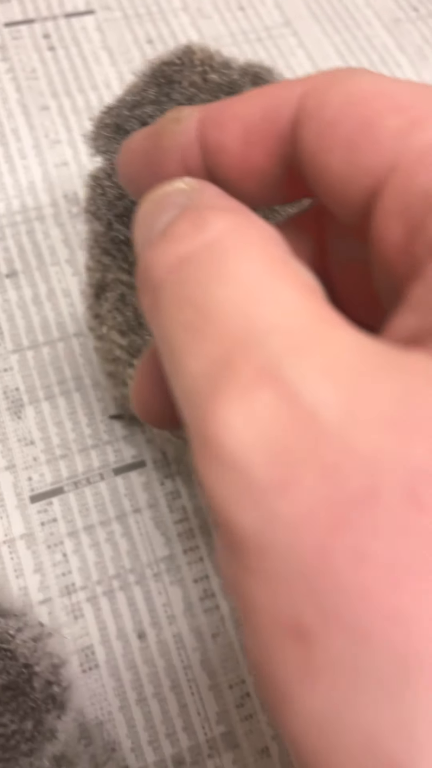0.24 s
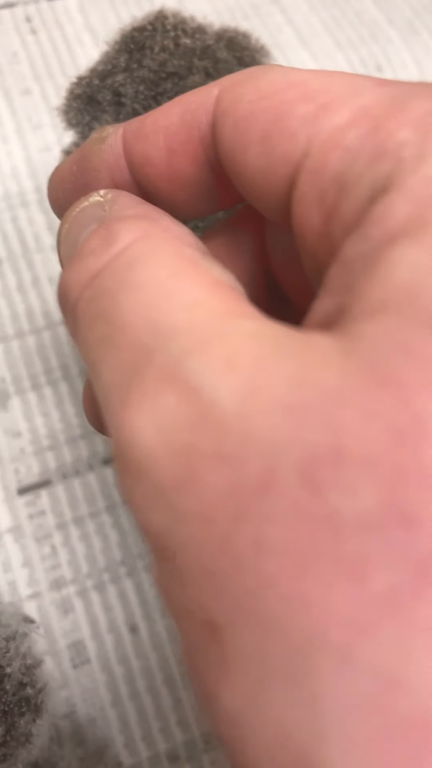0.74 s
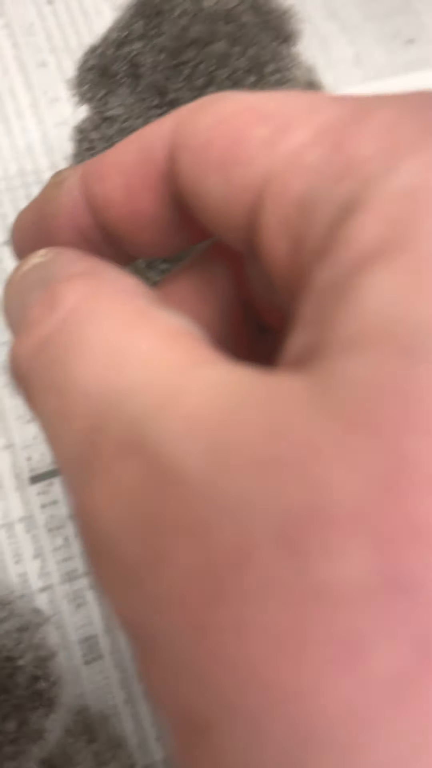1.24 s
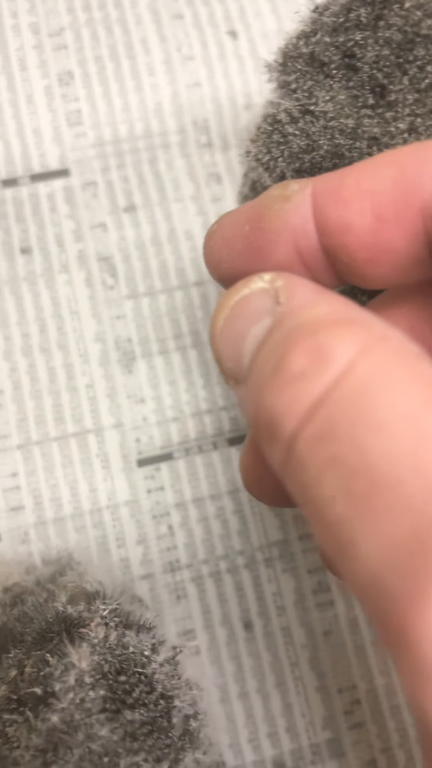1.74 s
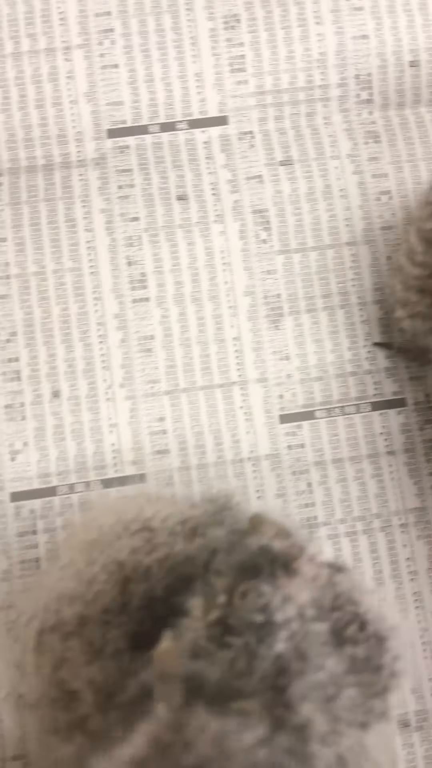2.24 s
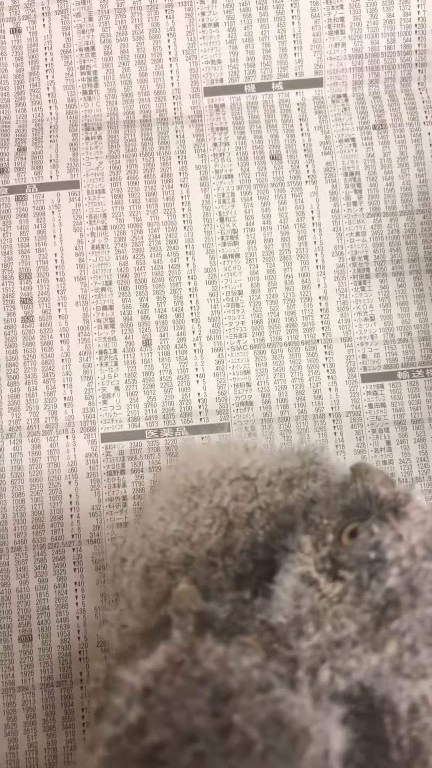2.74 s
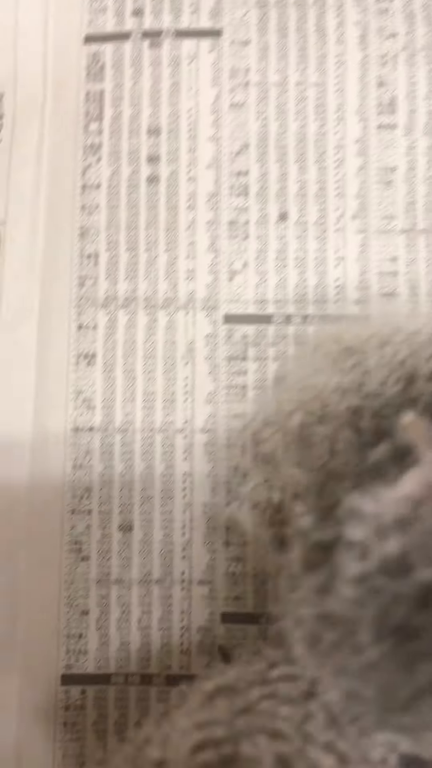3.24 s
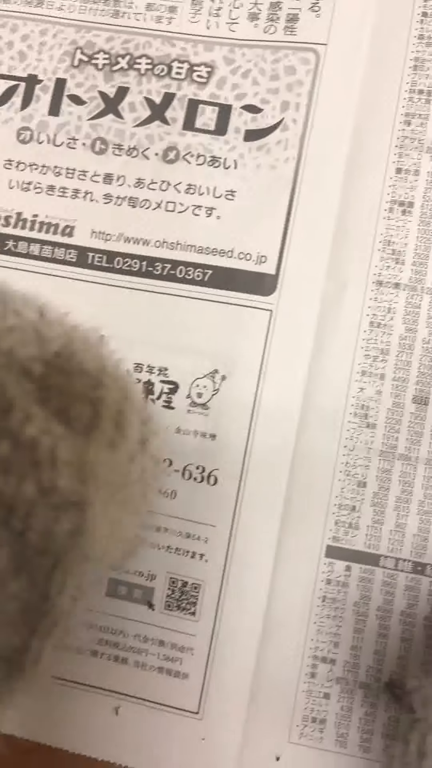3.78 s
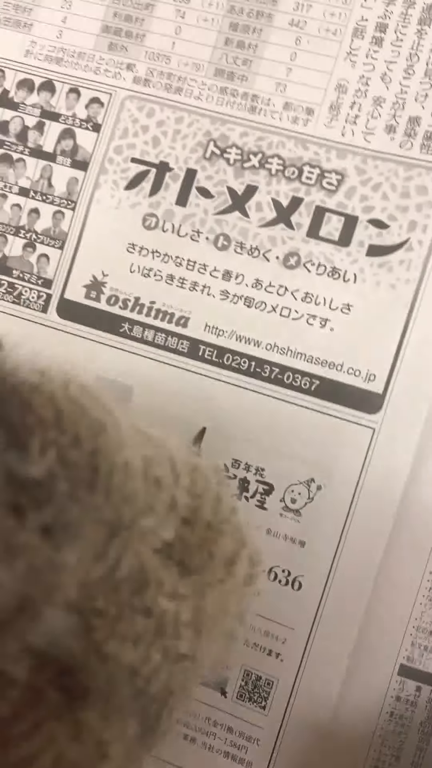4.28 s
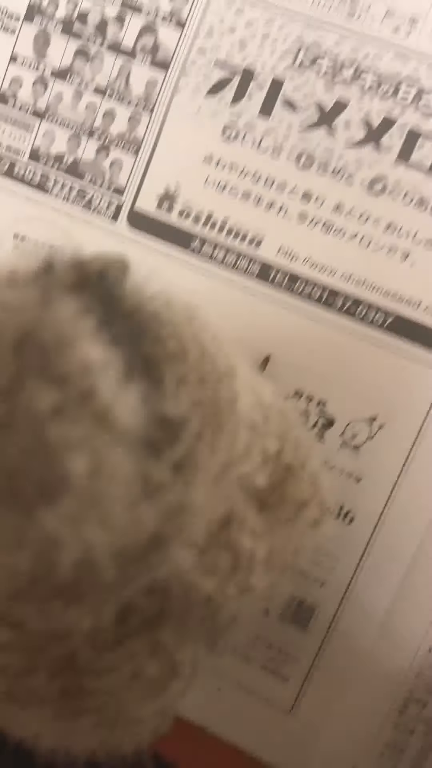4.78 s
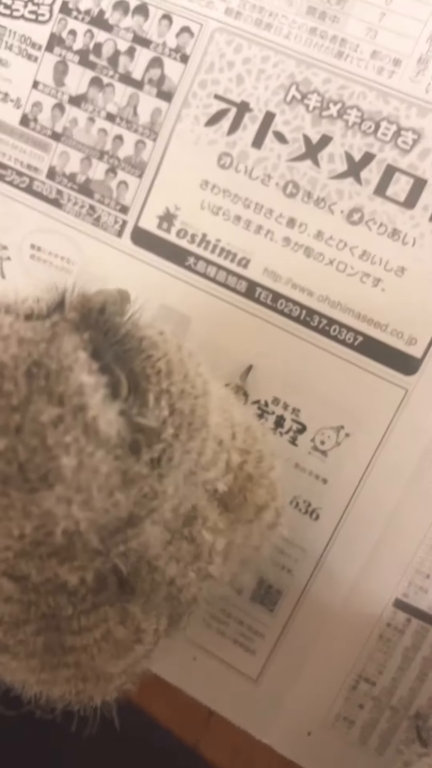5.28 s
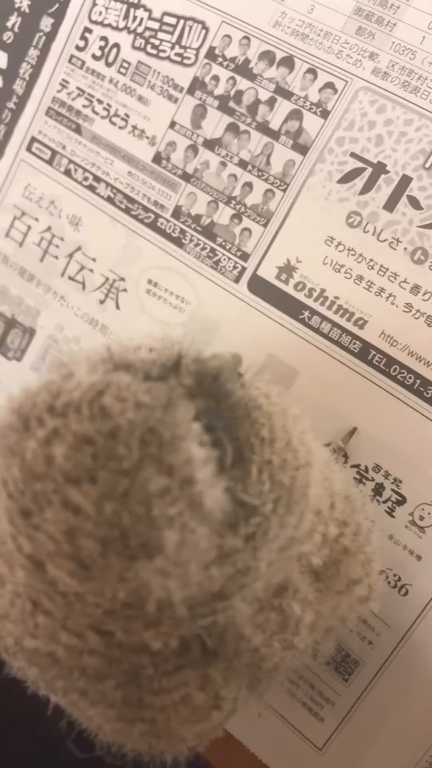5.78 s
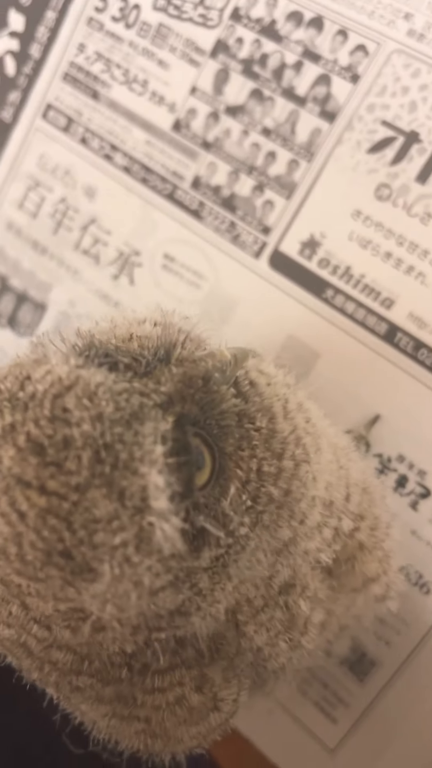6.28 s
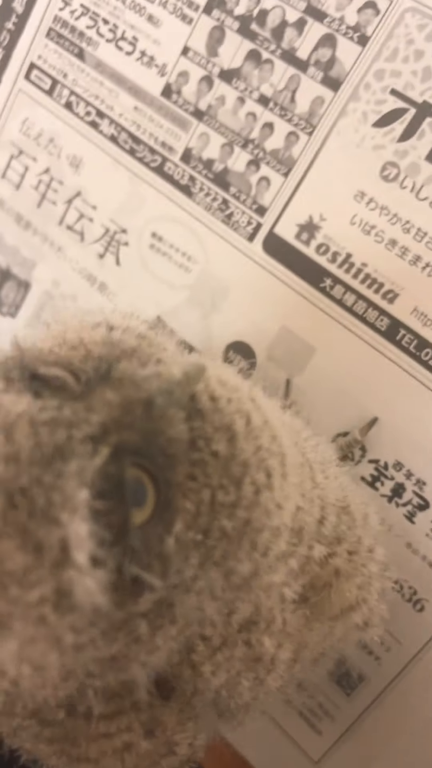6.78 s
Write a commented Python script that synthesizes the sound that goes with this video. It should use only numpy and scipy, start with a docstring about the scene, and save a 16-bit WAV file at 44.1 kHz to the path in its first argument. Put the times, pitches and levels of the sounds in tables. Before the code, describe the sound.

Owl chicks beg close to a stereo microphone in a small, fairly dry room. First comes one faint, wheezy call, then a pause with two soft taps. Three loud calls follow, each starting with a small chirp and thin whistle that breaks into a harsh, hissing screech. The first two loud ones end in falling squeaks. Low rumble, hum and a soft fan continue underneath.

```python
"""Owl chicks beg for food on newspaper in a small room, close to a pair of microphone ports: one faint call, then
three loud ones. A thin whistle from one voice of the syrinx breaks into a hissing screech when a second, lower
voice joins in; the two modulate each other amid turbulent air. The first three calls end in falling squeaks.
A few soft taps (damped sines) and beak clicks (noise bursts) sound over the room's rumble and hum and a fan."""
import sys
import numpy as np
from scipy import signal
from scipy.fft import rfft, irfft, next_fast_len
from scipy.io import wavfile
from scipy.ndimage import uniform_filter1d

SR = 44100
rng = np.random.default_rng(int(sys.argv[2]) if len(sys.argv) > 2 else 0)


def store_wav(level_fs):
    """Save 16-bit WAV to argv[1]."""
    pcm = np.round(np.clip(np.atleast_2d(level_fs), -1, 1) * 32767)
    wavfile.write(sys.argv[1], SR, pcm.T.astype(np.int16))


N = 309670
T = np.arange(N) / SR   # s
FREQS = np.maximum(np.arange(N // 2 + 1) * SR / N, 1)   # Hz

# catches, where the low voice sounds for a moment: start t/s, end t/s, high voice f/Hz, low voice f/Hz,
# level of each voice/dB and of the hiss/dB before the gains of both_voices, chaos (0-1)
CATCHES = [(1.074, 1.127, 2895, 1180, -59, -59.5, 0.57), (2.48, 2.508, 3220, 1340, -51.5, -57.5, 0.68),
           (2.725, 2.767, 3940, 1436, -55.5, -53, 0.3), (4.225, 4.249, 3180, 1267, -49, -53, 0.9),
           (6.33, 6.365, 3490, 1270, -43, -52.5, 0.47), (6.535, 6.581, 3860, 1428, -48.5, -45.5, 0.41)]


def from_db(db):
    """Decibels to amplitude: 20 dB is a factor of ten."""
    return 10 ** (np.asarray(db) / 20)


def at_time(rows, t):
    """Linear interpolation in time of every column of a curve."""
    s, *columns = np.transpose(rows)
    return [np.interp(t, s, c) for c in columns]


def at_hz(points, hz):
    """A spectrum interpolated on a logarithmic frequency axis."""
    f, value = np.transpose(points)
    return np.interp(np.log(hz), np.log(f), value)


def rms_one(x):
    """Normalization to unit mean power."""
    return x / np.sqrt(np.mean(x ** 2) + 1e-20)


def drift(rate_hz, t, order=2):
    """Low-passed white noise: a smooth random motion of spread about 1, as long as t."""
    white = rng.standard_normal(2 * SR)
    lowpass = signal.butter(order, rate_hz, fs=SR, output="sos")
    return rms_one(signal.sosfilt(lowpass, white))[-len(t):]


def coloured(spectrum):
    """Spectral shaping of white noise to rms 1, falling away below the spectrum's first point."""
    gain = from_db(at_hz(spectrum, FREQS)) * np.minimum(FREQS / spectrum[0][0], 1) ** 2
    return rms_one(irfft(rfft(rng.standard_normal(N)) * gain, N))


def phase_of(hz):
    """Phase is the time integral of a moving frequency."""
    return 2 * np.pi * np.cumsum(hz) / SR


def span(start, end, edge=.005):
    """Sample indices, times and a gate whose raised-cosine edges avoid spectral splatter."""
    at = np.arange(max(int((start - edge) * SR), 0), min(int((end + edge) * SR), N))
    gate = np.clip(np.minimum(T[at] - start, end - T[at]) / (2 * edge) + .5, 0, 1)
    return at, T[at], np.sin(gate * np.pi / 2) ** 2


def progress(start, end):
    """A gated span and the normalized time, 0 to 1, of each sample in it."""
    at, t, gate = span(start, end, edge=.004)
    return at, gate, np.clip((t - start) / (end - start), 0, 1)


def noise_band(hz, half_width_hz, t):
    """Quadrature modulation shifts low-pass noise to a moving centre: a steep-sided band of rms about 1."""
    phase = phase_of(hz)
    in_phase = drift(half_width_hz, t, order=4) * np.cos(phase)
    quadrature = drift(half_width_hz, t, order=4) * np.sin(phase)
    return in_phase + quadrature


def tones(lines):
    """Superposition of steady sines at the given rms levels."""
    return sum(from_db(db) * np.sqrt(2) * np.sin(2 * np.pi * (hz * T + rng.random())) for hz, db in lines)


def chicks():
    """Superposition of all the begging sounds: chirp and catch, whistle, screech, squeak."""
    # one arch of effort per screech; the last row is a second chick cutting in hoarsely:
    # start t/s, peak t/s, end t/s, high voice f/Hz at start, peak and end,
    # roundness of the arch (1 pointed, 2 round), high / low pitch ratio,
    # low voice's loudest moment t/s, its level/dB there and its fade to either side/(dB/s),
    # high voice level/dB at the peak and its trend/(dB/s), hiss level/dB at the peak and its swell/dB,
    # break-up t/s, chaos before and after it (0-1), throb (0-1); levels before the gains of both_voices
    screech_rows = [ (1.175, 1.53, 1.85, 2800, 3250, 2780, 1.6, 2.32, 1.77, -53.5, 14, -52.5, 18.5, -53, 10, 1.7, 0.34, .48, 0.22),
                    (2.752, 3.0, 3.37, 4060, 4500, 3130, 1.1, 2.89, 2.88, -32, 11, -37, 7.5, -26.5, 10.1, 3.0, 0.16, 0.876, 1.0),
                    (4.31, 4.78, 5.388, 3370, 4290, 3250, 1.6, 2.76, 4.904, -31.5, 30.8, -40.5, -1.5, -26, 15.6, 5.0, .37, .8, .1),
                    (6.61, 6.89, 7.3, 4070, 4470, 3600, 1.5, 2.83, 6.89, -34, 18, -33, -14, -26.8, 6.2, 6.9, 0.316, 0.6, 0),
                    (4.772, 4.93, 5.232, 3120, 3400, 3300, 1.3, 2.62, 5.2, -39, 4.6, -43.5, 21, -43.5, 2.2, 5.0, 0.887, 0.866, 0.12)]
    # turbulent air through throat and beak, four colours: f/Hz, relative level/dB per Hz
    hiss_spectra = [
        [(700, -13), (1050, -18), (2410, -15.5), (3100, -2), (4020, -11), (4710, -4), (6660, -18), (7690, -15),
         (9070, -17), (10450, -25.5), (11600, -22.5), (12290, -36), (12630, -48), (12860, -48)],
        [(700, -24.5), (1050, -33.5), (2410, -18), (3330, -13), (5860, -0.5), (6890, -12.5), (7580, -6),
         (8730, -13.5), (10110, -11.5), (10800, -6.5), (11480, -25), (12060, -21), (12520, -44.5), (12860, -55)],
        [(700, -28.5), (1050, -46.5), (2410, -12), (3450, -33.5), (4020, -5), (5050, -7), (5740, 0.5),
         (7010, -8.5), (7460, -4.5), (9190, -29.5), (9760, -5.5), (11600, -12.5), (12290, -25), (12860, -52.5)],
        [(700, -15.5), (1050, -33), (2410, -13), (2990, -23), (4250, -4.5), (5400, -22), (5860, 5.5),
         (6780, -5.5), (8270, 3.5), (10570, -14.5), (11600, -14), (12060, -22), (12400, -48), (12860, -48)],
    ]
    # index of the hiss colour of each screech
    throats = (0, 1, 2, 3, 1)
    airs = [hissing_air(spectrum) for spectrum in hiss_spectra]
    screeches = sum(arched_screech(row, airs[k]) for row, k in zip(screech_rows, throats))
    return screeches + whistles() + chirps() + catches(airs[1]) + squeaks()


def arched_screech(row, air):
    """Effort drives pitch and turbulence: both voices and the hiss rise to a peak, around break-up and throbs."""
    unsteady_hz, unsteady_low_db, unsteady_hiss_db = 11, 1.43, 0.92   # the effort is never quite even
    unsteady_pitch = .007   # share of the low voice's pitch
    burst_db, burst_s = 4.5, .005   # a screech breaks out with a short burst
    release_s, full_release_db, hiss_share = 0.12, -7.5, 0.59   # the low voice gives out, the hiss in part
    break_up_s = .17   # time for chaos to reach its later value
    throb_delay_s, throb_width_s = .05, 0.1   # the low voice throbs as the break-up begins
    swell_shape = 1.1   # roundness of the hiss level's arch
    (start, peak, end, start_hz, peak_hz, end_hz, roundness, ratio, low_peak, low_db, low_fade,
     high_db, high_trend, hiss_db, swell_db, break_up, early_chaos, late_chaos, throb) = row
    at, t, gate = span(start, end)
    since = t - peak
    slack = np.abs(since) / np.where(since < 0, peak - start, end - peak)   # 0 at full effort, 1 at either end
    hz = peak_hz + (np.where(since < 0, start_hz, end_hz) - peak_hz) * slack ** roundness
    uneven = drift(unsteady_hz, t)
    burst = burst_db * np.exp(-np.maximum(t - start, 0) / burst_s)
    release = full_release_db * np.clip(1 - (end - t) / release_s, 0, 1)
    broken = np.sin(np.pi / 2 * np.clip((t - break_up) / break_up_s, 0, 1)) ** 2
    low_level = low_db - low_fade * np.abs(t - low_peak) + release + unsteady_low_db * uneven
    hiss_level = hiss_db - swell_db * slack ** swell_shape + burst
    hiss_level = hiss_level + hiss_share * release + unsteady_hiss_db * uneven
    return both_voices(at, gate, air, hz, hz / ratio * (1 + unsteady_pitch * uneven),
                       low_db=low_level,
                       high_db=high_db + high_trend * since + burst,
                       hiss_db=hiss_level,
                       chaos=early_chaos + (late_chaos - early_chaos) * broken,
                       throb=throb * np.exp(-((t - break_up - throb_delay_s) / throb_width_s) ** 2))


def both_voices(at, gate, air, high_hz, low_hz, low_db, high_db, hiss_db, chaos, throb,
                high_jitter=0.0917, jitter_hz=450, low_gain_db=0.5, high_gain_db=-3.0,
                mixed_gain_db=1, air_gain_db=-1.5, throb_db=3, throb_hz=38.3):
    """Nonlinear coupling of two oscillators: combination tones, and chaos that smears lines into hiss."""
    # the two voices modulate each other: multiple of high f, multiple of low f,
    # level/dB against the hiss before the common gain
    mixed_tones = [(1, 1, -1.5), (2, -1, -11), (2, 0, -3), (2, 1, -13.5)]
    t = T[at]
    chaos = np.clip(chaos, .02, .98)
    voiced = np.sqrt(1 - chaos ** 2)
    low = phase_of(low_hz * (1 + .085 * chaos * drift(400, t)))
    high = phase_of(high_hz * (1 + high_jitter * np.sqrt(chaos) * drift(jitter_hz, t)))
    # the low voice stalls in regular throbs, and at random the more often the more chaotic it is
    throbs = np.clip(throb, 0, 1) * np.sin(np.pi * throb_hz * t) ** 4
    breaks = np.clip(1.5 * (drift(55, t) - 1.7 + 2.2 * np.minimum(chaos, .5)), 0, .85)
    stall = np.maximum(throbs, breaks)
    overtone = from_db(-11.5 - 43 * chaos) * np.sin(2 * low)
    low_flicker = from_db(chaos * (4.2 * drift(90, t) - 2.5))
    low_tone = np.sqrt(2) * (np.sin(low) + overtone) * (1 - stall) * low_flicker
    # it sheds a skirt of noise centred above its pitch
    skirt = noise_band(low_hz * 1.24, 390, t)
    low_voice = from_db(low_db + low_gain_db) * (voiced * low_tone + .72 * chaos * skirt)
    high_tone = np.sqrt(2) * np.sin(high) * from_db(1.9 * drift(130, t))
    high_noise = noise_band(high_hz, 410, t)
    high_voice = from_db(high_db + high_gain_db) * (voiced * high_tone + 0.61 * chaos * high_noise)
    # combination tones, each flickering on its own
    mixed = sum(from_db(db + 1.73 * drift(360, t)) * np.sin(round(m) * high + round(n) * low)
                for m, n, db in mixed_tones)
    mixed = mixed * from_db(mixed_gain_db) * np.sqrt(1 - chaos) * (1 - stall)
    # more air escapes as turbulence when the voices are chaotic or throb
    turbulence = .33 + .9 * chaos
    rush = air[at] * turbulence * from_db(air_gain_db + throb_db * throbs)
    out = np.zeros(N)
    out[at] = gate * (low_voice + high_voice + from_db(hiss_db) * (mixed + rush))
    return out


def hissing_air(spectrum, patchy_db=2.5):
    """Turbulence flares in short, narrow patches; unit power around the beak's main resonance, 5.3 to 7 kHz."""
    cells = signal.stft(coloured(spectrum), nperseg=512)[2]
    flare = uniform_filter1d(rng.standard_normal(cells.shape), size=5, axis=0)   # smooth over frequency
    flare = uniform_filter1d(flare, size=4, axis=1)   # and over time
    air = signal.istft(cells * from_db(patchy_db * rms_one(flare)))[1][:N]
    resonance = signal.butter(2, [5300, 7000], "band", fs=SR, output="sos")
    return air / np.std(signal.sosfilt(resonance, air))


def high_voice_alone(at, gate, hz, level_db, flutter_hz=130, flutter_db=2.0, pinch=0.63, full_db=-41):
    """A near-sinusoidal oscillator, shakier and richer in overtones when soft and pinched."""
    # partials of the whistle: multiple of f, level/dB (overtones before the pinch)
    whistle_tones = [(1, -3.5), (2, -11.5), (3, -16)]
    out, t = np.zeros(N), T[at]
    rich = from_db(pinch * np.clip(full_db - level_db, -10, 10))
    phase = phase_of(hz * (1 + .008 * np.minimum(rich, 1.4) ** 2 * drift(150, t)))
    tone = sum(from_db(db) * (rich if k > 1.5 else 1) * np.sin(round(k) * phase) for k, db in whistle_tones)
    flutter = flutter_db * rich * drift(flutter_hz, t)
    out[at] = np.sqrt(2) * tone * gate * from_db(level_db + flutter)
    return out


def whistles():
    """Building pressure drives the high voice along a sagging glide, until a catch takes air from it."""
    # a whistle leads into a screech: start t/s, end t/s, start f/Hz, end f/Hz, sag in the middle f/Hz,
    # start level/dB, end level/dB, both before the gains of the partials
    whistle_rows = [(1.105, 1.174, 2830, 2740, 121, -60, -60), (2.629, 2.753, 3246, 3860, 70, -36, -26.5),
                    (4.252, 4.311, 3270, 3210, 240, -53, -42.5),
                    (6.353, 6.613, 3292, 4080, 194.6, -45.5, -23)]
    swell_shape, attack_s = 1.9, .026   # the level changes ever faster
    waver, waver_hz = .008, 18   # share of the pitch, and its rate
    catch_duck_db = -5.5
    out, caught = np.zeros(N), np.zeros(N)
    for start, end, *_ in CATCHES:
        at, _, gate = span(start, end)
        caught[at] = gate
    for start, end, start_hz, end_hz, sag_hz, start_db, end_db in whistle_rows:
        at, gate, along = progress(start, end)
        hz = start_hz + (end_hz - start_hz) * along - sag_hz * (1 - (2 * along - 1) ** 2)
        level_db = start_db + (end_db - start_db) * along ** swell_shape + catch_duck_db * caught[at]
        attack = np.clip((T[at] - start) / attack_s, 0, 1) ** 2
        out += high_voice_alone(at, gate * attack, hz * (1 + waver * drift(waver_hz, along)), level_db)
    return out


def chirps():
    """Frequency modulation of the high voice: one quick pitch arch while the level fades."""
    # a chirp opens a loud call: middle t/s, top f/Hz, mid-chirp level/dB before the gains of the partials
    chirp_rows = [(2.499, 3327, -50.5), (4.246, 3296, -49), (6.35, 3483, -46.5)]
    length_s, arch_octaves, fade_db = .056, 0.15, -3
    out = np.zeros(N)
    for s, hz, db in chirp_rows:
        at, gate, along = progress(s - length_s / 2, s + length_s / 2)
        arch = 2 ** (-arch_octaves * (2 * along - 1) ** 2)
        out += high_voice_alone(at, gate, hz * arch, db + fade_db * (along - .5))
    return out


def catches(air, rise_octaves_per_s=1.4):
    """Brief coupled oscillation: rasps of both voices, rising slightly in pitch."""
    out = np.zeros(N)
    for start, end, high_hz, low_hz, voices_db, hiss_db, chaos in CATCHES:
        at, t, gate = span(start, end)
        rise = 2 ** (rise_octaves_per_s * (t - (start + end) / 2))
        out += both_voices(at, gate, air, high_hz * rise, low_hz * rise,
                           voices_db, voices_db, hiss_db, chaos, throb=0)
    return out


def squeaks():
    """Falling air pressure lowers the pitch: the high voice flares once and drops as the air runs out."""
    # middle t/s, length t/s, mid-squeak f/Hz, mid-squeak level/dB before the gains of the partials
    squeak_rows = [(1.845, 0.068, 2570, -54.5), (3.375, 0.024, 3150, -29.5), (5.238, 0.033, 3420, -29.5),
                   (5.395, .058, 2870, -42)]
    fall_octaves, edge_db = .29, -18
    out = np.zeros(N)
    for s, length, hz, db in squeak_rows:
        at, gate, along = progress(s - length / 2, s + length / 2)
        fall = 2 ** (fall_octaves * (.5 - along))
        out += high_voice_alone(at, gate, hz * fall, db + edge_db * np.abs(2 * along - 1))
    return out


def taps(rise_s=0.0005):
    """Damped resonance: each soft knock rings as an exponentially decaying sine."""
    # soft taps on the paper: t/s, initial level/dB before the rise, f/Hz, time to decay 60 dB t/s
    tap_rows = [(2.021, -34.5, 600, 0.021), (2.319, -39, 588, 0.034), (5.3, -25, 376.5, 0.013),
                (5.302, -36, 153, 0.094), (5.776, -29.5, 222, 0.016)]
    out = np.zeros(N)
    for s, db, hz, t60 in tap_rows:
        age = np.clip(T - s, 0, 1)
        rise = 1 - np.exp(-age / rise_s)
        out += from_db(db - 60 * age / t60) * np.sin(2 * np.pi * hz * age) * rise
    return out


def beak_clicks():
    """Broadband impact: bright noise that starts at once and decays exponentially."""
    # t/s, initial level/dB, time to decay 60 dB t/s
    click_rows = [(2.474, -63, .04), (2.652, -66, 0.013), (4.21, -47, 0.082), (5.775, -52.5, 0.034)]
    out, snap = np.zeros(N), coloured([(1500, -12), (6000, -9.5), (12000, 4.5)])   # (f/Hz, relative level/dB)
    for s, db, t60 in click_rows:
        out += from_db(db - 60 * np.clip(T - s, 0, 1) / t60) * (T >= s) * snap
    return out


def ports(x):
    """Path difference: two ports hear a near sound with frequency-dependent phase and level differences."""
    # f/Hz, phase by which left leads/rad
    port_phase = [(0, 0), (650, -.5), (1100, 0), (2500, 0), (3300, .5), (4300, 1.6), (4800, 3.1),
                  (5300, 5.3), (5900, 6.3), (6600, 6.8), (8350, 8.9), (9200, 9.5), (10200, 9.9),
                  (11300, 12.2), (12800, 12.7)]
    # f/Hz, left-right level/dB
    port_balance = [(1500, .3), (2400, .5), (3000, -4), (3400, -5.5), (4000, -1.2), (4600, -2), (5600, 0),
                    (12000, 0)]
    size = next_fast_len(N + SR)
    hz = np.maximum(np.arange(size // 2 + 1) * SR / size, 1)
    phase = np.interp(hz, *np.transpose(port_phase))
    half = from_db(at_hz(port_balance, hz) / 2) * np.exp(.5j * phase)   # each port takes half the difference
    return irfft(rfft(x, size) * np.array([half, 1 / half]), size)[:, :N]


def room(x, t60, wet_db):
    """Diffuse reverberation: convolution with exponentially decaying noise, different in each port."""
    age = T[:SR]
    tail = rng.standard_normal((2, len(age))) * from_db(-60 * age / t60) * (age > .001)
    tail /= np.sqrt(np.sum(tail ** 2, axis=1, keepdims=True))
    return from_db(wet_db) * signal.fftconvolve(x[None], tail, axes=1)[:, :N]


def diffuse(spectrum):
    """Spatial coherence of a diffuse field: stereo noise alike in the bass, unrelated in the high treble."""
    # likeness of the room's noise in both ports: f/Hz, correlation (0-1)
    likeness = [(60, .998), (180, .99), (320, .88), (470, .66), (700, .4), (1100, .45), (1650, .75),
                (2400, .4), (4000, .35), (8000, 0)]
    alike = np.clip(at_hz(likeness, FREQS), 0, .999)
    mid = irfft(rfft(coloured(spectrum)) * np.sqrt(1 + alike), N)
    side = irfft(rfft(coloured(spectrum)) * np.sqrt(1 - alike), N)
    return rms_one(np.array([mid + side, mid - side]))


def fan(blades_db=-6.0):
    """Flow noise plus blade tones, their level varying and falling overall as the microphone turns away."""
    # rush of air: f/Hz, relative level/dB per Hz
    fan_air = [(400, -22.5), (800, 9.5), (1300, 6), (2000, 2.5), (3000, -10), (4000, -11), (5000, -23),
               (7000, -21), (9000, -58.5), (12000, -17)]
    # blade tones: f/Hz, level/dB before the blade gain and the change of fan level
    fan_lines = [(1001, -66), (1168, -67), (1335, -67), (1502, -71.5), (1669, -74.5)]
    # rush level over time: t/s, level/dB
    fan_level = [(0, -62), (1.0, -60.5), (2.2, -63.5), (3.6, -66.5), (5.8, -65.5), (7.02, -67.5)]
    fan_db, = at_time(fan_level, T)
    rush = from_db(fan_db) * diffuse(fan_air)
    return rush + from_db(fan_db - fan_db[0] + blades_db) * tones(fan_lines)


def rumble_and_hum(rumble_db=-49.5):
    """Stationary room noise: low-frequency diffuse rumble and steady hum tones."""
    # rumble: f/Hz, relative level/dB per Hz
    rumble_spectrum = [(25, -22.5), (50, -2), (90, 3.5), (128, -5.5), (175, 1.5), (230, -3.5), (320, -12),
                       (450, -15), (650, -21.5), (1000, -31), (2000, -57)]
    # hum: f/Hz, level/dB
    room_hum = [(167, -68.5), (292, -76.5), (667, -73)]
    return from_db(rumble_db) * diffuse(rumble_spectrum) + tones(room_hum)


def scene():
    """Superposition of direct sound, quick reflections off paper and table, faint room tail and background."""
    near = chicks() + taps() + beak_clicks()
    near = near + room(near, t60=.025, wet_db=-14)[0]
    reflections = room(near, t60=0.09, wet_db=-24)
    room_tail = room(near, t60=0.78, wet_db=-27.5)
    return ports(near) + reflections + room_tail + fan() + rumble_and_hum()


def record(dry):
    """Zero-phase low-pass filtering cuts the top steeply above 12.6 kHz."""
    return signal.sosfiltfilt(signal.butter(20, 12600, fs=SR, output="sos"), dry)


dry = scene()
out = record(dry)
store_wav(out)
```